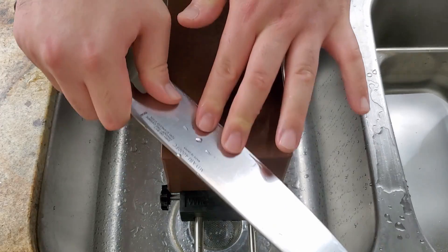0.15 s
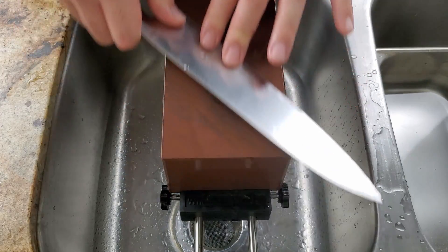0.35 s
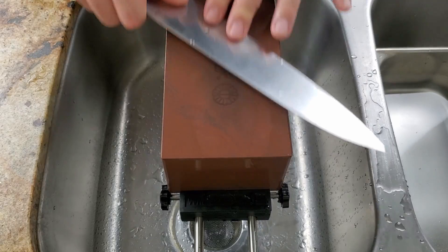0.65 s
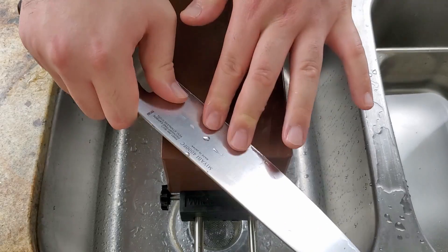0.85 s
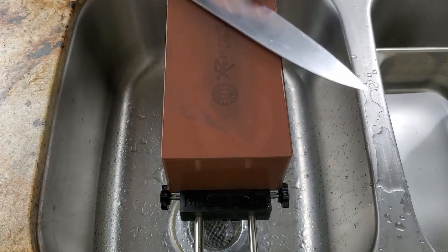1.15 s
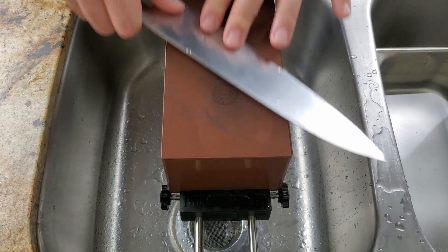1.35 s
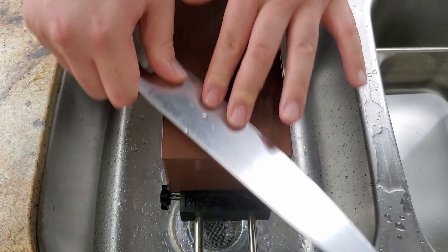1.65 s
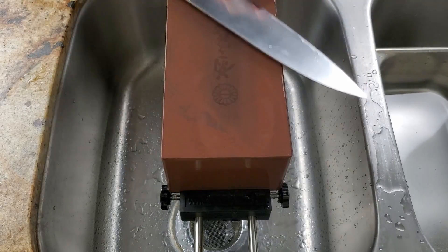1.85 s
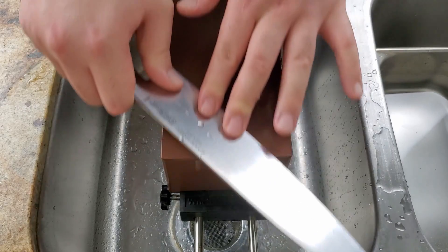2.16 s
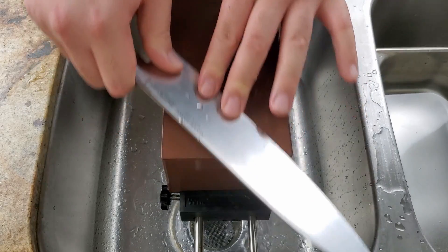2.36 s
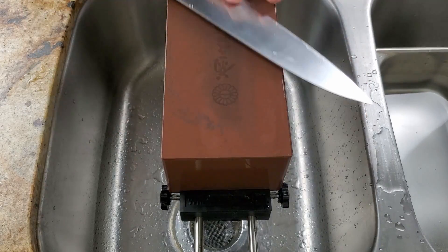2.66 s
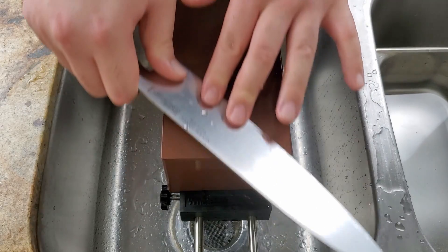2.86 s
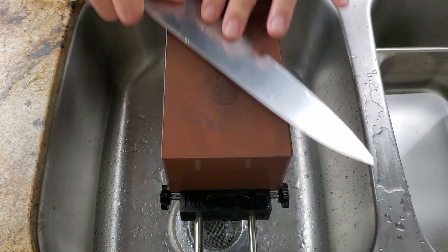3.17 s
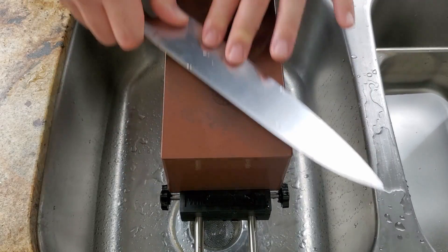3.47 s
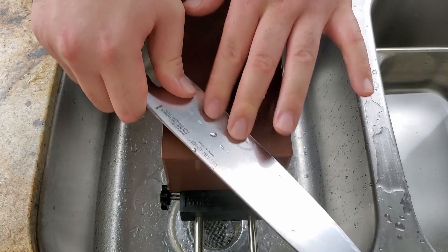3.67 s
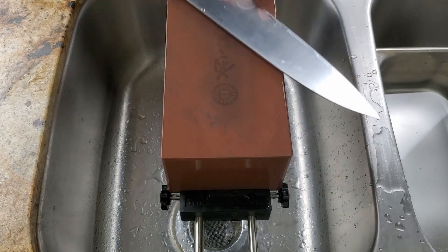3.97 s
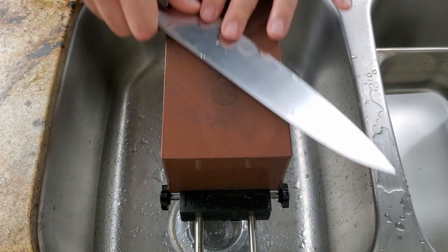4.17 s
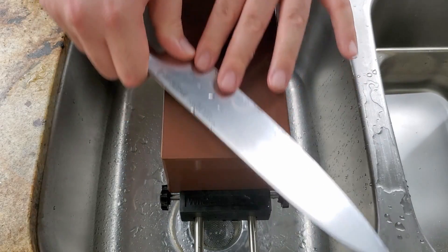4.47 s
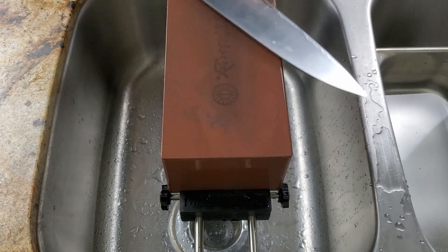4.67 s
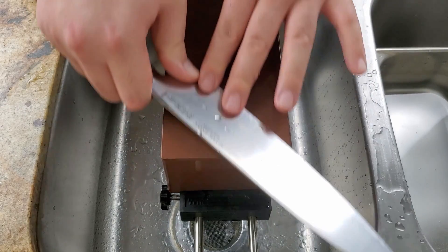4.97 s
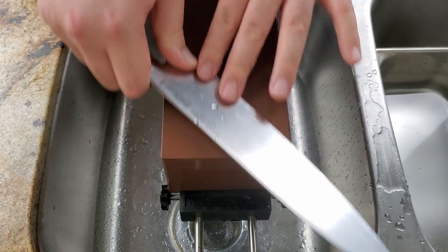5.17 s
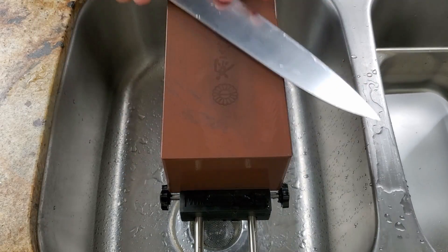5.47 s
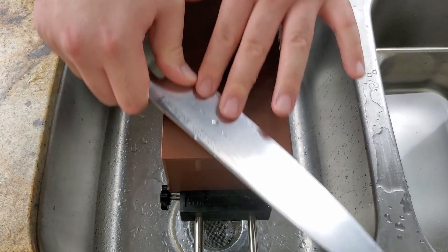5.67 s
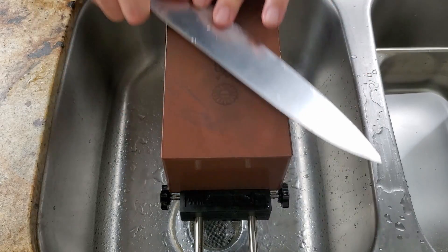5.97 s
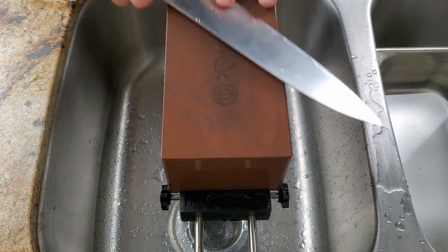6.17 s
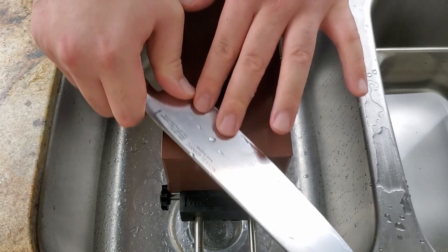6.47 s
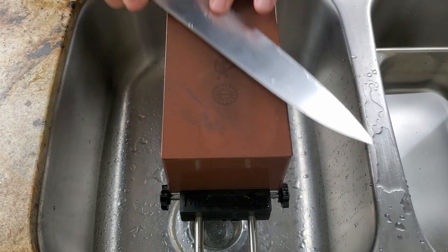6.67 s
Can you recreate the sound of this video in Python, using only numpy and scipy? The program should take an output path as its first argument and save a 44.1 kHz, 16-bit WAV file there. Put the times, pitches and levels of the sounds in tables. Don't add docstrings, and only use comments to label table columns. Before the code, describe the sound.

A close microphone in a quiet kitchen with a faint low hum hears a large knife being sharpened on a wet whetstone clamped over a steel sink. From 0 to about 7 seconds some twenty strokes follow one another evenly, each about a third of a second, pull and push alternating. Every scrape is a dense, bright, sandy hiss with metallic ringing and a hollow mid-pitched stone tone; it dips sharply at turns, near 0.24, 0.58, 0.92 and 1.26 and so on. Near-end turns are softest, far-end starts brighter and biting. Coarse catches and snapping grains tick out around 0.5, 1.2, 2.0, 4.0 and 5.5. Soft wooden-like knocks come at 0.4, 1.4, 3.6, 3.9, 4.6 and 5.3, with dull low basin booms beneath many strokes. Short tinny reflections follow at once. The scraping is still going at the end.

```python
import sys
import numpy as np
from scipy import signal
from scipy.fft import rfft, irfft
from scipy.io import wavfile
from scipy.ndimage import uniform_filter1d

SR = 44100
rng = np.random.default_rng(int(sys.argv[2]) if len(sys.argv) > 2 else 0)


def to_wav(sig):
    pcm = np.clip(np.atleast_2d(sig), -1, 1) * 32767
    pcm = np.round(pcm).astype(np.int16)
    wavfile.write(sys.argv[1], SR, pcm.T)


def to_linear_factor(level_db):
    exponent = np.asarray(level_db, float) / 20
    return 10 ** exponent


N = 300762

TURNS = [-.11, .238, .577, .92, 1.257, 1.624, 1.948, 2.31, 2.652, 3.015, 3.345, 3.716, 4.079, 4.431, 4.751,
         5.121, 5.45, 5.817, 6.149, 6.49, 6.84]
# [t/s, level change/dB, slowing/s, restart/s]
HALTS = [(0.24, -23.0, 0.032, 0.018), (0.576, -11.0, 0.009, 0.017), (0.925, -20.0, 0.037, 0.014),
         (1.256, -14.0, 0.013, 0.017), (1.623, -19.0, 0.034, 0.018), (1.949, -11.0, 0.011, 0.006),
         (2.314, -22.0, 0.026, 0.012), (2.653, -13.0, 0.018, 0.005), (3.017, -19.0, 0.032, 0.022),
         (3.344, -18.0, 0.009, 0.038), (3.717, -23.0, 0.028, 0.031), (4.077, -14.0, 0.01, 0.015),
         (4.431, -20.0, 0.023, 0.028), (4.752, -8.0, 0.01, 0.022), (5.122, -20.0, 0.028, 0.016),
         (5.452, -15.0, 0.017, 0.036), (5.82, -21.0, 0.025, 0.015), (6.148, -13.0, 0.014, 0.021),
         (6.492, -19.0, 0.026, 0.017)]


def evened(x):
    return x / np.sqrt(np.mean(x ** 2) + 1e-20)


def read(points, hz):
    f, value = np.transpose(points)
    return np.interp(np.log(hz + 1), np.log(f + 1), value)


def resonate(x, hz, width):
    turn = np.exp(2j * np.pi * np.cumsum(hz * np.ones(len(x))) / SR)
    r = np.exp(-np.pi * width / SR)
    smooth = signal.lfilter([1], [1, -2 * r, r * r], x * turn.conj())
    return 2 * np.sqrt(2 * (1 - r) ** 3) * (turn * smooth).real


def wander(count):
    return evened(uniform_filter1d(uniform_filter1d(rng.standard_normal(N), count), count))


def bumps(t, rows):
    out = np.zeros(len(t))
    for s, db, before, after in rows:
        near = slice(max(round((s - .3) * SR), 0), round((s + .3) * SR))
        v = t[near] - s
        side = np.where(v < 0, max(before, .002), max(after, .002))
        out[near] += db * np.exp(-(v / side) ** 2)
    return out


def room():
    # [f/Hz, level/dB per Hz]
    hum_spectrum = [(25, -18), (50, -3.5), (83, 0), (110, -3), (200, -8), (500, -10), (1500, -5),
                    (5000, -35), (16000, -38)]
    hz = np.fft.rfftfreq(N, 1 / SR)
    shaped = rfft(rng.standard_normal(N)) * to_linear_factor(read(hum_spectrum, hz))
    return to_linear_factor(-62.5) * evened(irfft(shaped, N))


def thuds(events, hz, rise, t60, puff_db):
    out, u = np.zeros(N), np.arange(12000) / SR
    for (s, db), (tune, phase) in zip(events, rng.random((len(events), 2))):
        push = evened(resonate(rng.standard_normal(len(u)), 194, 330)) * to_linear_factor(puff_db - 60 * u / 0.22)
        tone = np.sin(2 * np.pi * (hz * (0.975 + 0.045 * tune) * u + phase))
        swell = (1 - np.exp(-u / rise)) * to_linear_factor(db + 5 - 60 * u / t60)
        part = out[round(s * SR):][:len(u)]
        part += (swell * (tone + push))[:len(part)]
    return out


def basin_booms():
    # [t/s, peak level/dB]
    booms = [(0.249, -62), (0.548, -59), (0.761, -65), (0.95, -54), (1.283, -55), (1.358, -57),
             (1.959, -54), (2.329, -59), (2.659, -57), (3.037, -61), (3.196, -64), (3.628, -62),
             (3.763, -56), (4.072, -63), (4.548, -57), (4.778, -52.5), (5.154, -54), (5.479, -56),
             (5.865, -59.5), (6.179, -56), (6.498, -69)]
    return thuds(booms, hz=82.8, rise=0.013, t60=0.29, puff_db=-4.5)


def bridge_knocks():
    # [t/s, peak level/dB]
    knocks = [
        (0.417, -53.5),
        (1.416, -53),
        (2.324, -54.5),
        (3.627, -52),
        (3.935, -52),
        (4.557, -52),
        (5.119, -52.5),
        (5.337, -52),
        (6.124, -54),
    ]
    return thuds(knocks, hz=303, rise=0.004, t60=0.11, puff_db=-7.5)


def basin(x, t60):
    u = np.arange(6000)
    taps = rng.choice([-1., 1.], len(u)) * (rng.random(len(u)) < .05)
    taps = taps * to_linear_factor(-60 * u / SR / t60) * (u > 40)
    return signal.oaconvolve(x, taps / np.linalg.norm(taps))[:N]


def stone():
    # [place -1 far, 0 near, 1 far; low, second, third ring level/dB
    flex = [
        (-0.856, -86, -61, -57.5, 2),
        (-0.58, -68.5, -49.5, -45, 0.9),
        (-0.38, -48, -52.5, -45.5, 0.74),
        (-0.178, -47, -61, -40.5, -0.5),
        (0.053, -55.5, -77, -58, 0.3),
        (0.207, -48.5, -60.5, -51.5, 0.6),
        (0.443, -52.5, -54, -51, 1.5),
        (0.798, -69, -50.5, -49, 0.9),
        (0.78, -70, -59, -55, 1.13),
    ]
    # [low, second, third ring level change/dB, low ring f/Hz, sagged third ring f/Hz]
    stroke_loads = [(6, 2.5, -3, 676, 1260), (0.5, -3.5, 3, 630, 1295), (6.5, 1, -1, 640, 1350),
                    (0, 3.5, 4, 618, 1290), (4, 1, -2, 650, 1340), (-3, -4.5, 2.3, 624, 1285),
                    (2.5, 0.5, -2.5, 655, 1330), (1.5, -2, 3, 640, 1324), (-2, 2.5, -1.3, 637, 1270),
                    (1.8, -1.5, 2.5, 623, 1333), (2, -2, -9.5, 650, 1200), (-5.5, -5.5, -4, 617, 1240),
                    (-2, -5, -7.5, 621, 1180), (-2, 1.5, -0.5, 622, 1290), (-5.5, -1, -2.5, 615, 1190),
                    (0, -3, 1, 600, 1270), (-1, -1, -4, 630, 1195), (-2, 1, 1.5, 628, 1310),
                    (-1.5, -3.5, -6.5, 600, 1180), (0.5, -3.5, -0.5, 621, 1300)]
    # [t/s, level change/dB, build-up/s, release/s]
    sings = [(.17, 8, .05, 0.038), (.45, -3.5, .08, .06), (1.03, -5, .05, .05), (2.5, 1, 0.055, .05),
             (.6, 3, 0.051, .06), (.87, 2.5, .04, .03), (1.3, -4, 0.046, .05), (1.56, 7.5, 0.043, 0.024),
             (1.75, 1, .06, 0.055), (2.24, 6.5, 0.051, 0.019), (2.37, 6.5, 0.018, 0.032),
             (2.62, -11, 0.059, .06), (3.76, -20, .03, 0.055), (4.4, 4, 0.03, .05), (4.65, 5, .06, .06),
             (5.22, -7, 0.034, .04), (5.36, 2, .04, .03), (5.78, 5, 0.027, .03), (5.86, 8, 0.022, 0.027),
             (6.5, -2, 0.048, 0.043)]
    # [t/s, level change/dB, build-up/s, release/s]
    hums = [(.2, 3, 0.027, .04), (.82, -4, 0.041, .04), (.9, 6.5, .03, .03), (1.6, -6, .03, 0.034),
            (2.3, -3, .03, .03), (3.02, 5.5, 0.058, .05), (3.6, -5, 0.044, 0.023), (3.73, -5, 0.025, 0.028),
            (4.4, 7.5, .04, .04), (5.02, 7, .03, .03), (5.2, 0.5, .04, 0.045), (5.8, 1.5, .06, .06)]
    t = np.arange(N) / SR
    travel = np.interp(t, TURNS, np.arange(len(TURNS)))
    place, *columns = np.transpose(flex)
    low_db, second_db, third_db, sag = (np.interp(travel % 2 - 1, place, c) for c in columns)
    load = uniform_filter1d(np.array(stroke_loads)[travel.astype(int)].T, size=1300, axis=1)
    halt_db = bumps(t, HALTS)
    low_db = low_db + load[0] + bumps(t, hums) - 3.0 + 0.13 * halt_db
    second_db = second_db + load[1] - 4.0 + 0.15 * halt_db
    third_db = third_db + load[2] + bumps(t, sings)
    near_hz = 1411
    third_hz = near_hz + sag * (load[4] - near_hz)
    modes = []
    for hz in (592.5, 649.8):
        modes.append((low_db - 15.0 * ((hz - load[3]) / 47.7) ** 2, hz, 24))
    for hz in (1212, 1288, 1416):
        modes.append((third_db - 6.0 - 9.0 * ((hz - third_hz) / 97) ** 2 + 0.55 * halt_db, hz, 50))
    modes.append((third_db - 4.5 + 0.36 * halt_db, np.clip(third_hz, 1150, 1440), 35))
    modes.append((second_db, 824, 40))
    out = np.zeros(N)
    for db, hz, width in modes:
        shake, bent = rng.standard_normal(N), hz * (1 + 0.011 * wander(count=2500))
        ring = resonate(shake, bent, width)
        ring = evened(ring / abs(uniform_filter1d(ring ** 2, size=500) + 1e-12) ** 0.13)
        halo = evened(resonate(shake, bent, 5 * width))
        out += to_linear_factor(db + 1.9 * wander(count=1500)) * evened(ring + 0.58 * halo)
    return out


def chips():
    # [t/s, peak level/dB, ring f/Hz]
    snaps = [(0.4058, -13, 7530), (0.459, -16, 7750), (0.5022, -12, 2500), (0.518, -13, 7570),
             (0.524, -9, 8010), (0.6133, -9, 13000), (0.7136, -6, 7760), (0.947, -21, 2430),
             (1.215, -15, 6710), (1.2737, -20, 6670), (1.7673, -11.5, 7750), (1.7897, -20, 8310),
             (1.8084, -12.5, 7700), (1.824, -14, 8400), (1.8576, -11.5, 2700), (1.9869, -12, 6670),
             (1.9964, -13.4, 5980), (2.04, -21, 6800), (2.0585, -13.3, 8310), (2.5438, -27, 7400),
             (2.6624, -17, 7270), (2.7372, -10.7, 8500), (3.2595, -20, 6900), (3.328, -18, 5550),
             (3.9113, -19, 8000), (3.9765, -18, 8050), (3.9857, -19, 7700), (4.025, -10, 3700),
             (4.0639, -21, 7920), (4.0883, -23, 7880), (4.5769, -15, 2530), (4.9502, -13, 2620),
             (5.4282, -10, 6670), (5.4533, -22, 7960), (5.4817, -11, 7900), (5.5203, -10, 8130),
             (5.56, -14, 8100), (5.931, -14, 5680), (6.1484, -27, 6760), (6.1796, -12, 6030),
             (6.744, -9, 6900)]
    t60, crack, level_db = 0.0078, 0.31, -3.0
    out, u = np.zeros(N), np.arange(500) / SR
    for (s, db, hz), noise in zip(snaps, rng.standard_normal((len(snaps), len(u)))):
        snap = np.sin(2 * np.pi * hz * u) + crack * np.diff(noise, prepend=0)
        fade = np.minimum(u / 0.00033, 1) * to_linear_factor(db + level_db - 60 * u / t60)
        part = out[round(s * SR):][:len(u)]
        part += (fade * snap)[:len(part)]
    return signal.sosfilt(signal.butter(6, 2000, "highpass", fs=SR, output="sos"), out)


def grit(per_s=12000, spread_db=1.5, smooth=0.69):
    size = to_linear_factor(spread_db * np.minimum(rng.exponential(1, N), 3)) * rng.choice([-1., 1.], N)
    ticks = evened(size * (rng.random(N) < per_s / SR))
    crush = np.minimum(rng.exponential(1, N), 1.8) * (rng.random(N) < 110 / SR)
    bursts = 1 + 0.64 * signal.lfilter([1], [1, -np.exp(-1 / (0.00095 * SR))], crush)
    slurry = smooth * rng.standard_normal(N)
    return evened((ticks + slurry) * bursts * to_linear_factor(0.6 * wander(count=400)))


def pressure(t):
    reach_db = [-24.5, -35.5, -26, -33, -28.5, -35.5, -31.5, -35, -30, -35.5, -25.5, -38.5, -26, -38.5, -26,
                -34.5, -27, -35.5, -26.5, -37.5, -21.5]
    # [t/s, level change/dB, build-up/s, release/s]
    leans = [(.47, 1, .08, 0.14), (.676, 3.5, 0.05, 0.068), (.82, 3, 0.085, .035),
             (1.075, 3.5, 0.046, 0.018), (1.135, 1, 0.022, .03), (1.215, 3, 0.04, 0.036),
             (1.51, 3.5, 0.25, 0.04), (1.665, -2, 0.026, 0.049), (1.764, 1.5, 0.044, 0.028),
             (2.14, 5.5, 0.09, 0.068), (2.474, 6, 0.035, 0.036), (2.57, -1.5, .03, .04),
             (2.733, -3, 0.018, .003), (2.81, 6, 0.046, 0.043), (2.9, 3.5, .04, 0.03),
             (3.225, -7, 0.069, 0.033), (3.3, -2.5, .015, 0.028), (3.39, 2, .03, 0.28),
             (3.79, 3, 0.11, 0.045), (4.0, -4, 0.092, 0.019), (4.19, 3, 0.053, 0.27),
             (4.48, -0.5, 0.018, 0.051), (4.647, 8, 0.14, 0.11), (5.06, -3.5, 0.031, 0.066),
             (5.36, 7.5, 0.13, 0.074), (5.77, -2.5, 0.047, .04), (5.99, 7, 0.081, 0.11),
             (6.25, 1.5, .07, 0.27), (6.65, 3.5, 0.1, 0.046)]
    # [t/s, level change/dB, onset/s, release/s]
    slips = [(0.406, 2.5, 0.0076, 0.005), (0.43, -9, 0.014, 0.014), (0.654, -7.5, 0.016, 0.0036),
             (1.501, 6, 0.023, 0.023), (1.858, 1, 0.0027, 0.0062), (1.884, -2.5, 0.007, 0.016),
             (1.923, 7, 0.012, 0.012), (1.973, 1, 0.011, 0.005), (1.986, 0.5, 0.003, 0.017),
             (2.029, -2.5, 0.01, 0.017), (2.079, 5, 0.009, 0.025), (2.272, -8, 0.017, 0.0053),
             (2.517, 8, 0.0046, 0.015), (2.569, -5.5, 0.045, 0.012), (2.62, 4, 0.012, 0.02),
             (2.738, 3.5, 0.0023, 0.034), (3.06, -5, 0.005, 0.011), (3.316, -6.5, 0.014, 0.0097),
             (3.379, 7.5, 0.031, 0.011), (3.855, 5, 0.0078, 0.012), (3.969, -3, 0.018, 0.003),
             (3.993, 0, 0.003, 0.012), (4.017, -8.5, 0.051, 0.0073), (4.025, 9, 0.0019, 0.02),
             (4.625, 0.5, 0.0044, 0.025), (4.748, 1, 0.003, 0.011), (4.068, -1, 0.002, 0.01),
             (2.332, -3, 0.002, 0.013), (3.256, 2.5, 0.004, 0.02), (1.722, 3, 0.002, 0.015),
             (5.485, 8.5, 0.043, 0.011), (6.034, 3.5, 0.0099, 0.011), (6.107, -4, 0.019, 0.0057),
             (6.433, -5, 0.0089, 0.019), (6.613, 4.5, 0.0073, 0.037), (6.822, -8, 0.011, 0.008)]
    # [t/s, peak level/dB]
    catches = [(.2618, -21), (.4998, -8), (.6629, -41), (.7174, -10), (0.9463, -23), (1.2137, -5),
               (1.274, -8), (1.291, -10), (1.64, -24), (3.74, -23), (1.824, -25), (1.8567, -9),
               (1.9555, -14), (1.9858, -9), (1.9974, -8), (2.059, -13), (2.3305, -20), (2.511, -12),
               (2.661, -24), (2.737, -13), (3.328, -16), (3.3726, -8), (3.8544, -20), (3.9123, -12.5),
               (3.974, -23), (4.024, -8), (4.088, -11), (5.1407, -23), (5.48, -11), (6.508, -23)]
    level_db = np.interp(t, TURNS, reach_db) + bumps(t, list(leans) + list(HALTS) + list(slips))
    power, u = to_linear_factor(2 * level_db), np.arange(4000) / SR
    for s, db in catches:
        part = power[round(s * SR):][:len(u)]
        part += to_linear_factor(2 * (db - 13.0 - 60 * u / 0.028))[:len(part)]
    return np.sqrt(power)


def scrape():
    # [freedom of lower modes level/dB, of upper modes level/dB, bite of fine edge level/dB, low hiss level/dB]
    grip = [(2.5, 7, 1.5, 3), (2.3, 4, 0, -3), (-3, -15, 0.8, 0.2), (-1.5, -9, 0.5, 5.5),
            (2.5, 4, 0.5, -0.5), (1.6, 2, -1.5, -1), (-1, -1, 1, 1.5), (-2, 3.5, 3, 2.5), (0.5, 2, 0, 0),
            (0.8, -2, 3, 2.5), (-1, 2, 2, 1.7), (-0.6, -2, 1, -19), (3, 9, 2.5, 3.5), (-4, -5, -0.5, -0.5),
            (3.5, 9.5, 0.5, 4), (-4.5, -9, 1, 2.5), (4.5, 13, 3, 4.5), (-6.5, -2, -1, -1.5),
            (3, 10, 3, 3.5), (-8, -3, 1.5, -.4)]
    # [t/s, level change/dB, build-up/s, release/s]
    sizzles = [(.45, 2, .05, .05), (.75, 1, .05, .08), (1.1, 2.5, .05, 0.081), (1.35, 3, 0.068, .08),
               (1.78, 3, .06, .08), (2.09, 2, .03, .05), (2.45, -1.5, .05, .05), (2.8, 2.5, 0.046, 0.071),
               (3.13, -1.5, .05, .05), (3.44, 1.5, 0.036, 0.075), (3.76, 5, .02, .04),
               (3.85, 1.5, 0.054, .05), (.3, 1.5, .02, .04), (4.03, 1.5, .01, 0.018),
               (4.2, -3.5, .05, 0.074), (4.65, 5, .03, .07), (4.85, 1.5, 0.054, .06), (5.36, 5, .06, .06),
               (5.6, -1.5, .05, .06), (6.02, 2, .06, 0.051), (6.28, -1, .05, .06), (6.7, 0.5, .06, 0.065)]
    open_db = [.2, .2, .2, .2, .2, .2, .2, .2, .2, 1.7, .2, 0.12, .2, 1.3, .2, 0.74, 1.4, .2, .2, .2]
    # [f/Hz, level/dB per Hz]
    hiss = [(400, -62), (1000, -20.5), (1500, -12.5), (2000, -3), (3000, -5.5), (5000, -2.45), (7000, 0),
            (9000, -3), (10500, -7), (13300, -5), (14600, -9.5), (15800, -17.5)]
    # [f/Hz, width/Hz, level/dB, best place 0 near-1 far, reach, extra level when pulled/dB]
    body = [(1750, 80, -22.5, 0.14, 0.42, -0.5), (2124, 330, -17.5, 0.54, 0.12, 0.5),
            (2445, 152, -13, 0.57, 0.14, -5), (2694, 460, -13, 0.62, 0.3, -5),
            (3267, 150, -15.5, 0.64, 0.12, -6), (3540, 86, -17.5, 0.94, 0.26, -3.5),
            (4290, 67, -36, 0.084, 0.57, -1), (5627, 83, -14.5, 0.39, 0.21, 2),
            (6150, 650, -21, 1, 0.48, 9), (7120, 1400, -13.5, 0.775, 0.11, 3.5),
            (8280, 1400, -15, 0.9, 0.6, 3.5)]
    t = np.arange(N) / SR
    travel = np.interp(t, TURNS, np.arange(len(TURNS))) % 2
    place, pulled = abs(travel - 1), uniform_filter1d(1. * (travel < 1), size=900)
    middles = np.convolve(TURNS, [.5, .5], "valid")
    lower_db, upper_db, bite_db, hiss_db = (np.interp(t, middles, c) for c in np.transpose(grip))
    bite_db = bite_db + 5.2 * pulled * np.exp(-((place - .7) / 0.2) ** 2)
    bite_db = bite_db - 1.0 * (1 - pulled) * place ** 3 + bumps(t, sizzles)
    drive = grit() * pressure(t)
    hz, frames, z = signal.stft(drive, SR, nperseg=512, noverlap=384)
    fine, broad = rng.standard_normal((2, len(frames), len(hz))).transpose(0, 2, 1)
    fine = evened(uniform_filter1d(uniform_filter1d(fine, size=12, axis=1), size=2, axis=0))
    broad = evened(uniform_filter1d(uniform_filter1d(broad, size=20, axis=1), size=12, axis=0))
    top = np.clip((hz - 8500) / 3000, 0, 1)[:, None]
    far = np.interp(frames, t, place ** (3.3 + 2.5 * pulled))
    low = np.clip((2300 - hz) / 600, 0, 1)[:, None] * far
    bottom = np.clip((2300 - hz) / 400, 0, 1)[:, None]
    gap = np.exp(-((hz - 4400) / 900) ** 2)[:, None]
    colour_db = read(hiss, hz)[:, None] + 2.0 * fine + 0.8 * broad - 13 * low
    colour_db += top * np.interp(frames, t, bite_db)
    colour_db += bottom * np.interp(frames, t, hiss_db)
    colour_db += gap * np.interp(frames, middles, open_db)
    out = to_linear_factor(3.0) * signal.istft(z * to_linear_factor(colour_db), SR, nperseg=512, noverlap=384)[1][:N]
    for f, width, db, best, reach, pull_db in body:
        freedom_db = lower_db if f < 3000 else upper_db * (f < 5000)
        touch = np.exp(-.5 * ((place - best) / max(reach, .03)) ** 2)
        touch = touch * to_linear_factor(pull_db * pulled + freedom_db + 0.69 * wander(count=1300))
        bent = f * (1 + 0.016 * wander(count=3000))
        out += to_linear_factor(db) * resonate(drive * touch, bent, max(width, f / 11))
    tip = np.exp(-.5 * ((place - 0.44) / 0.12) ** 2) * to_linear_factor(-14 - 10 * pulled + 3.1 * lower_db)
    return out + resonate(drive * tip, 2763 * (1 + 0.016 * wander(count=3000)), 176)


def scene():
    knife = scrape() + stone() + chips()
    low = bridge_knocks() + basin_booms()
    walls = to_linear_factor(-11) * basin(knife, t60=.09)
    loud_db = 10 * np.log10(abs(uniform_filter1d(knife ** 2, size=3000)) + 1e-9)
    ducked = room() * to_linear_factor(-0.25 * (loud_db + 34))
    return (knife + walls + low + ducked)[None]


def roll_off(x):
    return signal.sosfilt(signal.butter(12, 15830, fs=SR, output="sos"), x)


def record(dry):
    cut = signal.sosfilt(signal.butter(2, 48, "highpass", fs=SR, output="sos"), dry)
    cut = signal.oaconvolve(cut, signal.firwin(401, 16300, window=("kaiser", 8), fs=SR)[None], "same")
    return roll_off(cut)


dry = scene()
out = record(dry)
to_wav(out)
```